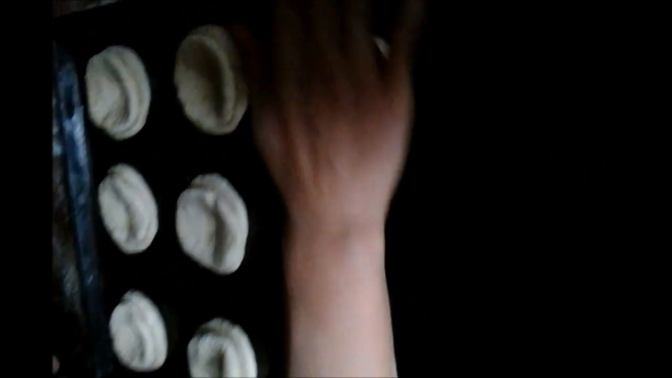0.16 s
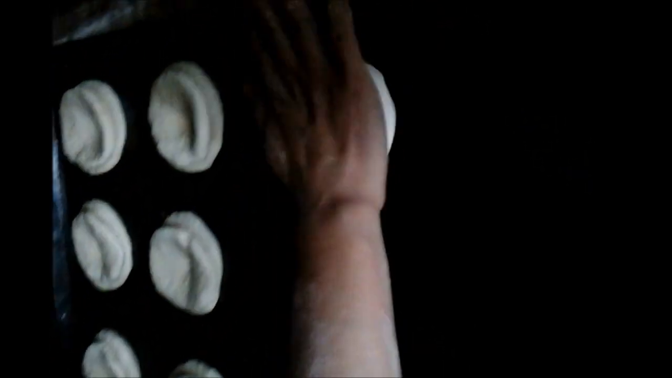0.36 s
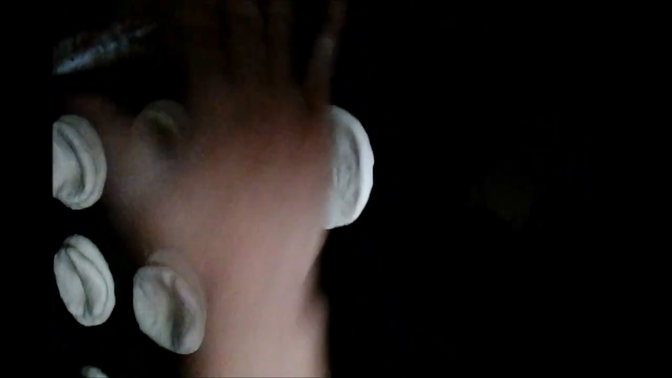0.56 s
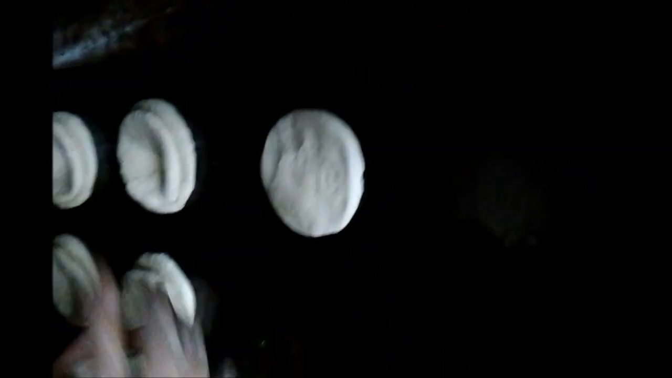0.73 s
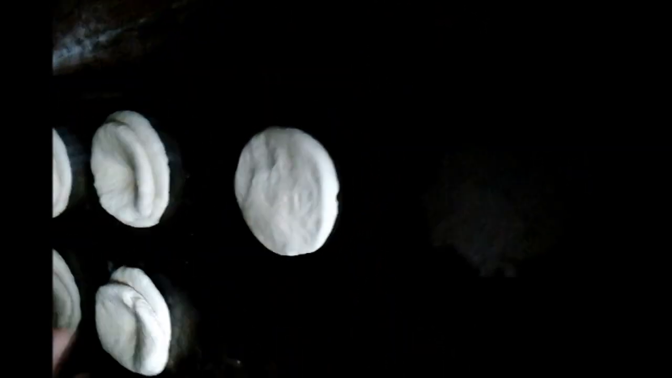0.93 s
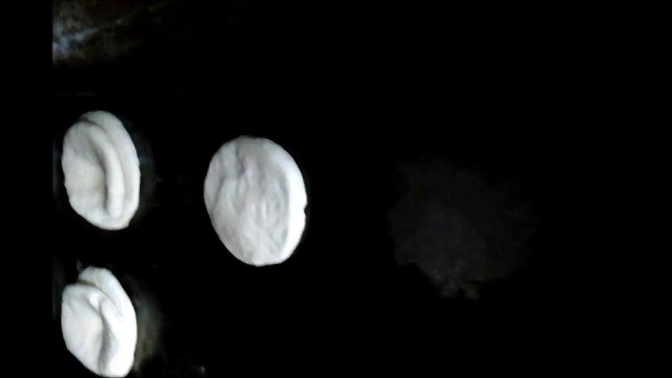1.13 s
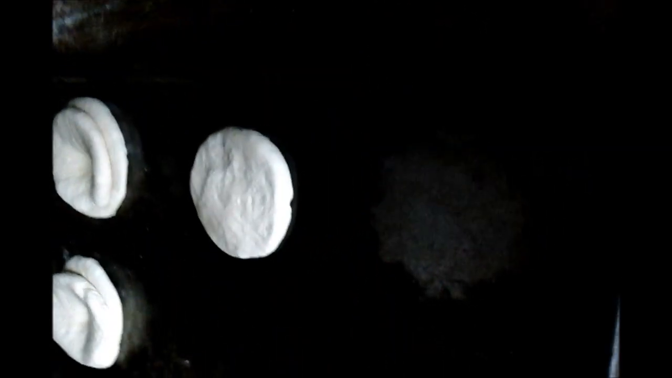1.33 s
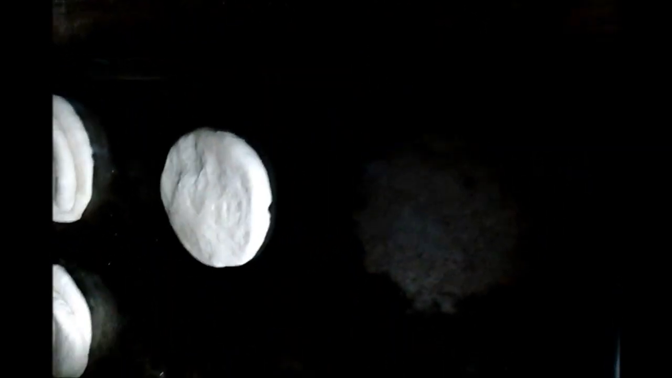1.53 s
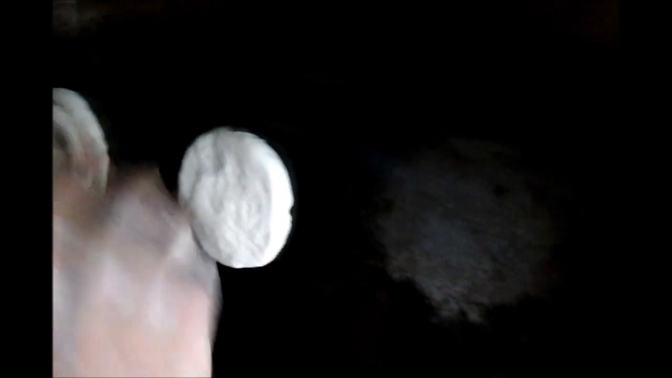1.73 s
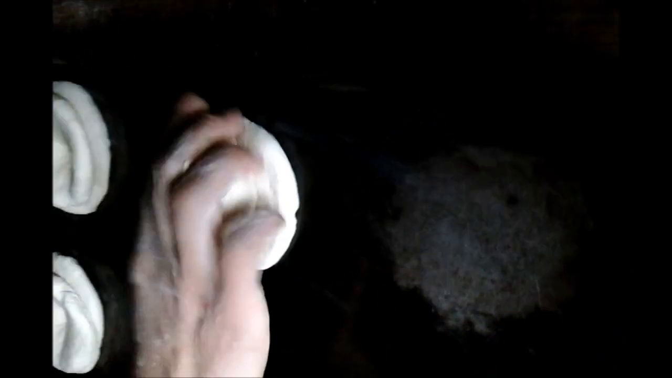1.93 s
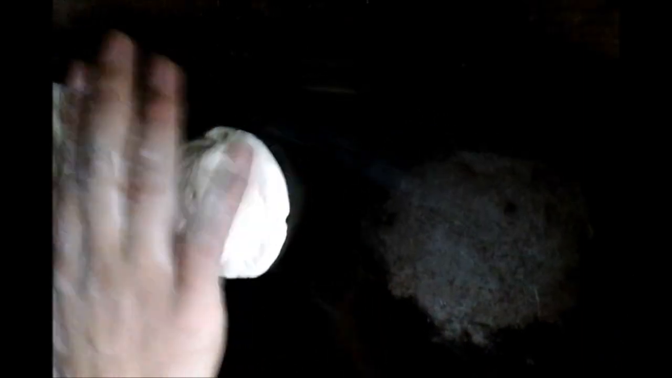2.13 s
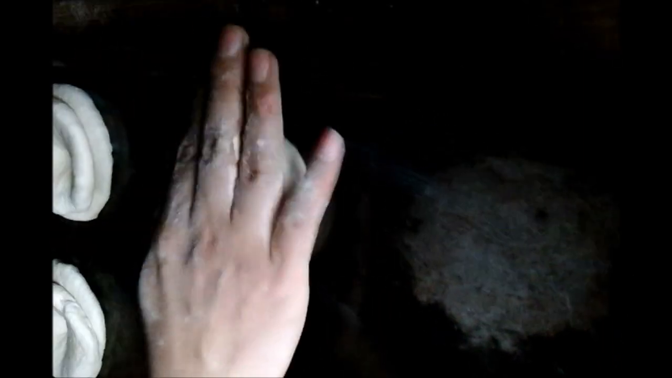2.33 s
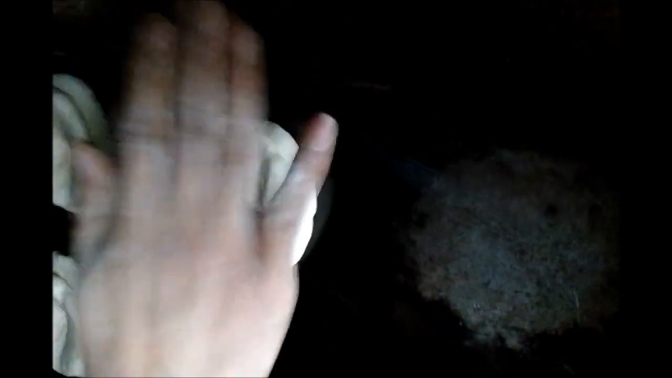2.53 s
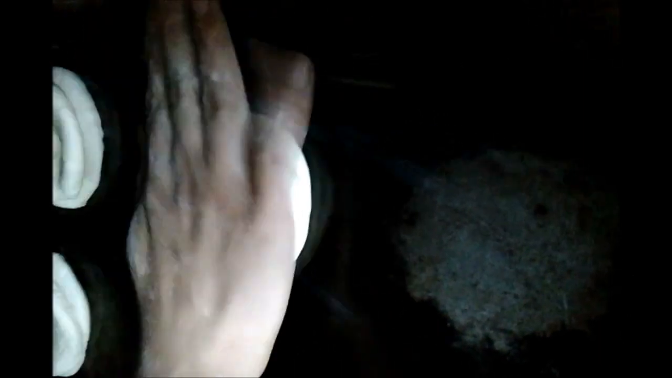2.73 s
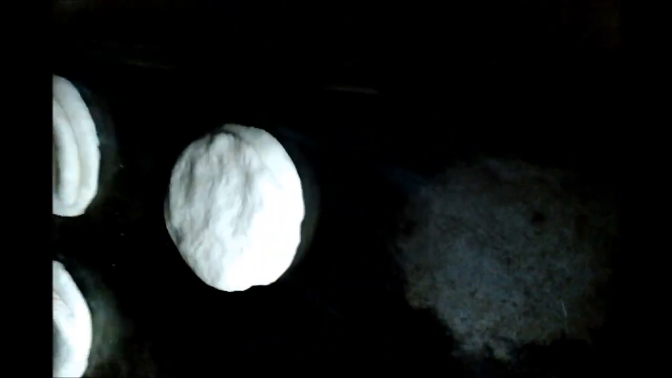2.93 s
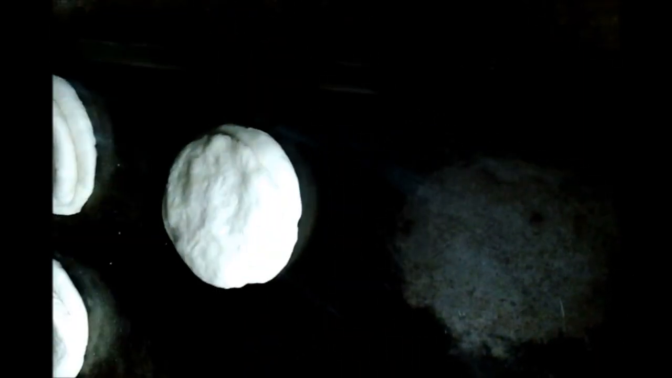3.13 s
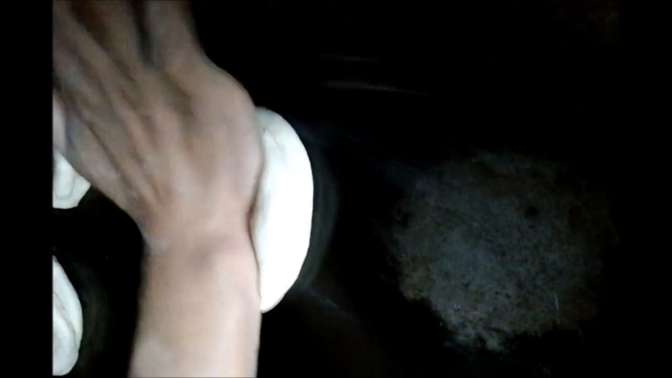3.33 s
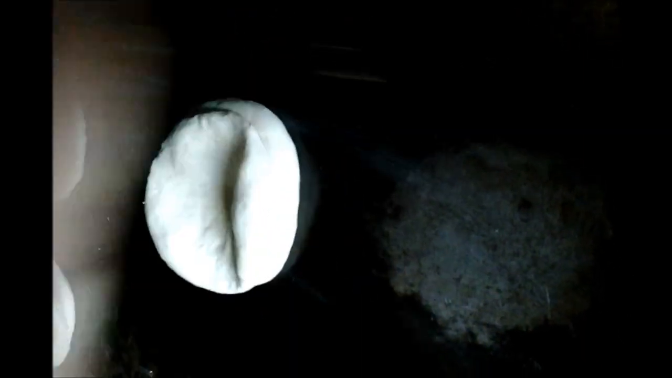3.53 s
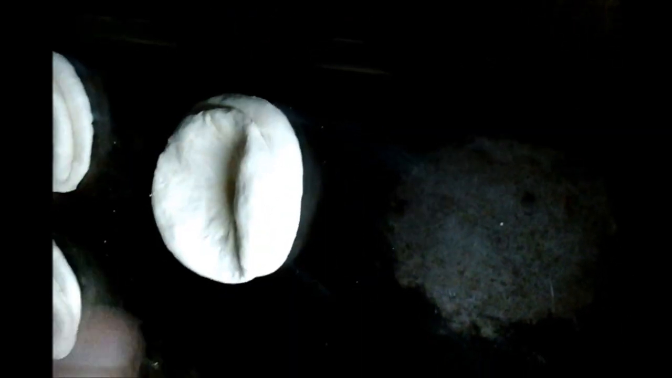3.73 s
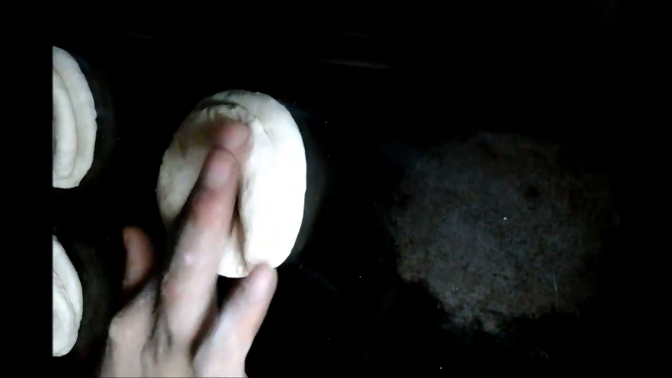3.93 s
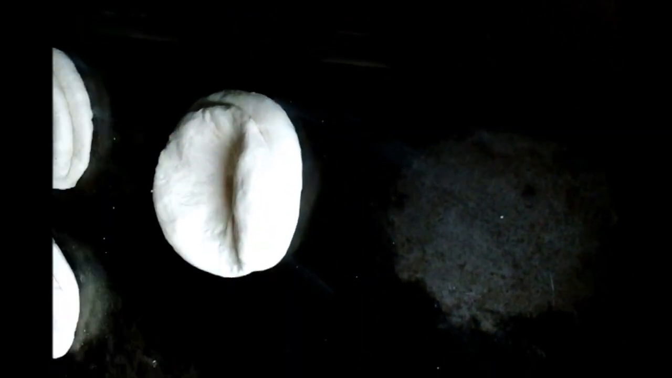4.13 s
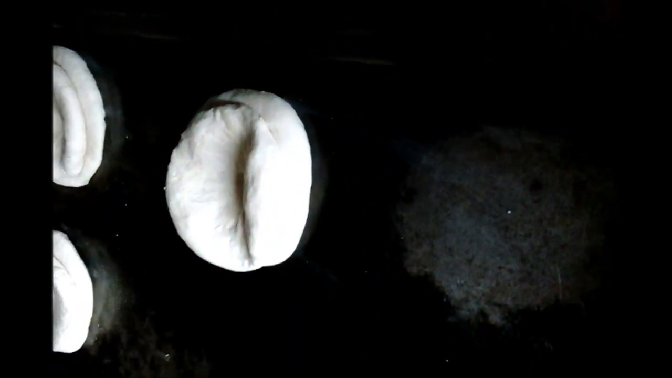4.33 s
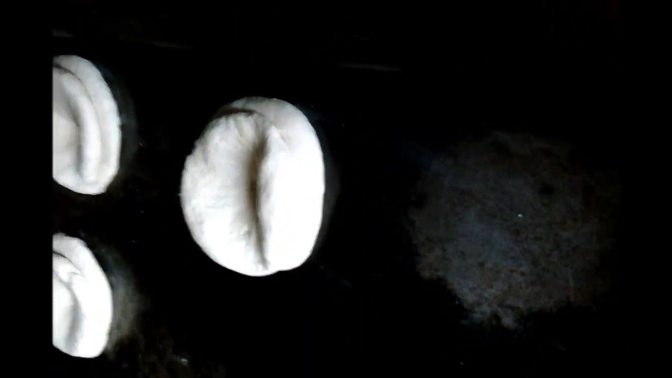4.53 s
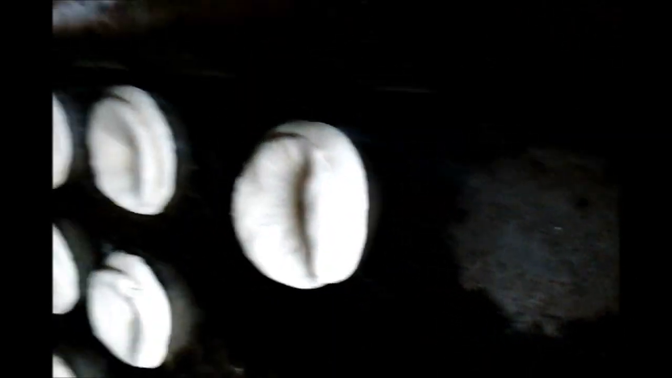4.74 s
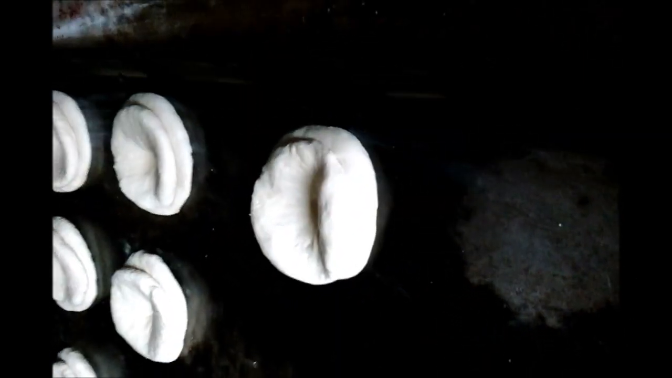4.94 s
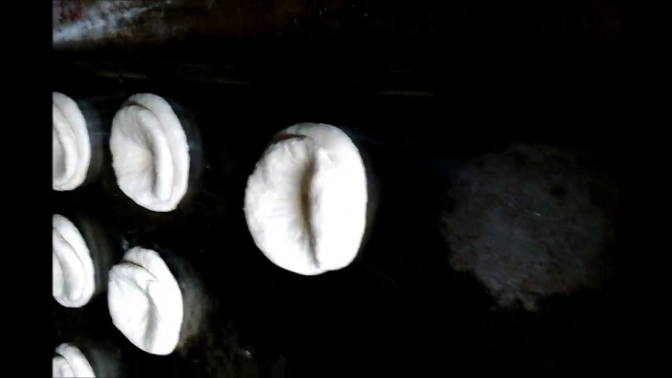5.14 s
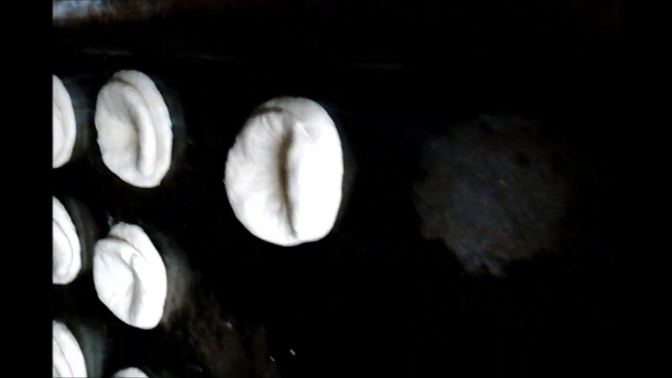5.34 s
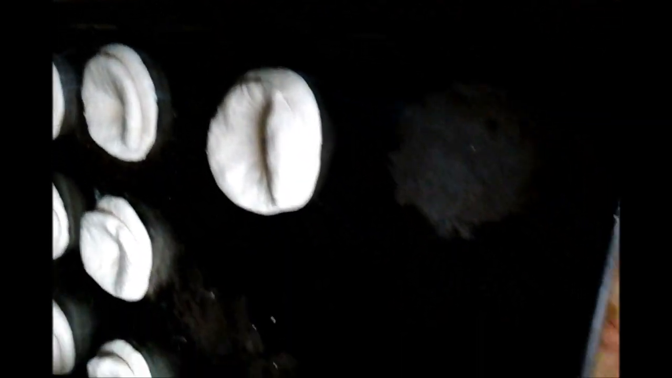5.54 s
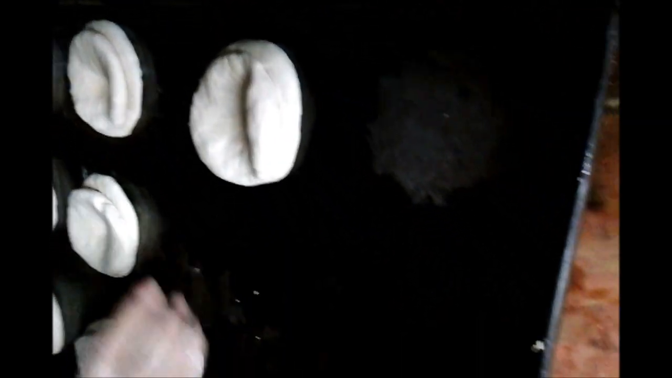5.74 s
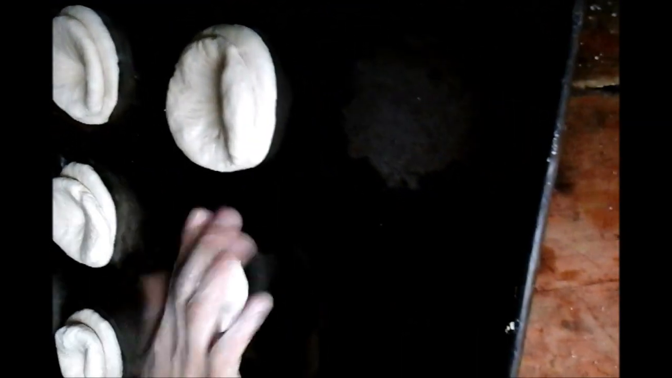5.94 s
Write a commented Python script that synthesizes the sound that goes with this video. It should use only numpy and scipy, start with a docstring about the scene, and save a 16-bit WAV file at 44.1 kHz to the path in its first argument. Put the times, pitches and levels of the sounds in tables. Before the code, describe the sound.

A small room with a steady low rumble and faint hiss, heard through close stereo microphones. From 0 to 1 s, soft pats on dough and dull, short metallic tray knocks come irregularly, with floury finger brushing and tiny sticky ticks. From about 1.1 to 1.9 s it is nearly quiet, with only faint brushes and ticks. Knocks resume at 2 s and thicken from 2.4 s; a crisp slap with a strong tray knock lands at 2.77 s. Around 3.3 to 3.36 s comes the loudest moment: a rapid cluster of hard, flat smacks with deep thuds, briefly overloading. A solid knock follows at 3.57 s, then smaller ones at 3.65-3.77 s and lighter taps until 4.5 s. Brushing and short gritty tray scrapes run from 4.5 to 5.3 s, with a soft low thud near 4.95 s. A faint scrape follows at 5.6 s, and a small smack ends it at 5.95 s.

```python
"""Hands pat and slap rounds of soft dough on a metal baking tray in a small bakery room.
Each push rocks the tray, which knocks dully on the table: bending waves, damped modes and a sinking twang.
Skin smacks the dough with shaped noise bursts; fingertips tick loose, and brushes and shoves are noise grains.
A steady low rumble and faint hiss lie beneath.
Two close microphones of opposite polarity hear it; the hardest slap overloads them."""
import sys
import numpy as np
from scipy import signal
from scipy.fft import rfft, irfft
from scipy.io import wavfile

SR = 44100
rng = np.random.default_rng(int(sys.argv[2]) if len(sys.argv) > 2 else 0)


def transcribe(u):
    """Save the signal u as a 16-bit wav file named by the first command-line argument.

    u: samples, shape (n,) or (channels, n), limited to [-1, 1]; the rate is SR.
    q: integer samples, one column per channel.
    """
    v = np.clip(np.atleast_2d(u).T, -1, 1)
    q = np.round(v * 32767).astype(np.int16)
    wavfile.write(sys.argv[1], SR, q)


N = 263718  # length in samples

# spectrum of hollow, dull noise, for the palm pocket and the chattering rim: (frequency [Hz], level [dB])
HOLLOW_SPECTRUM = [(60, -17), (300, -4.5), (600, -5.5), (1050, 0), (1700, -9), (2800, -7), (5000, -15.5),
                   (14000, -50.5)]


def amp(db):
    """Decibels to gain."""
    return 10 ** (np.asarray(db) / 20)


def unit(x):
    """Scales to rms 1."""
    return x / np.sqrt(np.mean(x ** 2) + 1e-20)


def read(points, hz):
    """Reads a table on a log-frequency axis."""
    f, value = np.transpose(points)
    return np.interp(np.log(hz + 1), np.log(f + 1), value)


def add(mix, s, sound):
    """Mixes a sound in at time s."""
    part = mix[max(round(s * SR), 0):][:len(sound)]
    part += sound[:len(part)]


def bins(size):
    """Frequencies of a real spectrum."""
    return np.fft.rfftfreq(size, 1 / SR)


def pulse(spectrum, size=4096):
    """The sharpest causal (minimum-phase) pulse with this spectrum, of energy 1."""
    log_gain = np.log(amp(read(spectrum, abs(np.fft.fftfreq(size, 1 / SR)))))
    shape = np.fft.ifft(np.exp(np.conj(signal.hilbert(log_gain)))).real
    return shape / np.linalg.norm(shape)


def colour(x, spectrum):
    """Gives a sound this spectrum without smearing its attack."""
    return signal.fftconvolve(x, pulse(spectrum))[:len(x)]


def diffuse(size):
    """Spectra of noise arriving from all sides: closely alike at both microphones in the bass only."""
    mic_spacing_m, sound_speed_m_s = 0.15, 343
    a, b = rfft(rng.standard_normal((2, size)))
    same = np.sinc(2 * bins(size) * mic_spacing_m / sound_speed_m_s)
    return np.array([a, same * a + np.sqrt(1 - same ** 2) * b])


def hush(level_db=-50.5, own_db=-11):
    """Steady low rumble and faint hiss, a little of it separate at each microphone."""
    # (frequency [Hz], level [dB])
    hush_spectrum = [(20, -3), (60, -2), (110, -0.5), (170, 5.5), (300, -1), (500, -7.5), (1000, -15),
                     (2000, -22), (3600, -23.5), (5000, -24.5), (5900, -17.5), (7500, -25.5), (9500, -25.5),
                     (14500, -26)]
    hz = bins(N)
    own = rfft(rng.standard_normal((2, N))) * hz / (hz + 60)
    noise = diffuse(N) + amp(own_db) * own
    return amp(level_db) * unit(irfft(noise * amp(read(hush_spectrum, hz)), N))


def smack(db, length_s, hollow_db, gap_hz, size=8192):
    """Air spurts through the closing gap between skin and dough; the palm's pocket adds a hollow pop."""
    # hiss of the spurting air: (frequency [Hz], level [dB])
    hiss_spectrum = [(25, -13.5), (110, 5.5), (900, -20.5), (2000, -14.5), (3200, -0.5), (4800, 1.5),
                     (6000, -4), (7500, -1.5), (10000, -21), (14500, -27)]
    gap_width_hz, gap_db, hiss_db = 2900, -5, -6  # width of the resonance on each of its two passes
    crackle_db, fizz_db, fizz_slope = 4, -26, 0.45  # slope in dB of fizz lost per dB of strength

    t = np.arange(size) / SR
    swell = (1 - np.exp(-t / 0.0013)) * np.exp(-(t / length_s) ** 2)
    jet, puff = swell * rng.uniform(-1.123, 1, (2, size))  # slightly lopsided noise
    # tacky skin grips in tiny snaps
    crackle = jet * amp(crackle_db * np.minimum(rng.exponential(1, size), 5))
    peak = signal.iirpeak(gap_hz, gap_hz / gap_width_hz, fs=SR)
    gap = signal.lfilter(*peak, signal.lfilter(*peak, jet))

    sound = amp(gap_db) * unit(gap)
    sound += amp(hiss_db) * unit(colour(crackle, hiss_spectrum))
    sound += amp(hollow_db) * unit(colour(puff, HOLLOW_SPECTRUM))
    # dry flour fizzes, most plainly under a light touch
    sound += amp(fizz_db - fizz_slope * db) * unit(crackle)
    return sound * amp(db) * jet.std()


def smacks():
    """Skin smacks on dough, and small ticks as tacky dough lets go of a fingertip: near sound and room send."""
    # (time [s], strength [dB], length [s], hollow of the palm [dB], low for flat fingers)
    hits = [(.042, -30, 0.0044, 0), (0.367, -27, 0.0033, -2), (0.386, -28, 0.0049, 2),
            (0.447, -33, 0.019, -4.5), (1.06, -46, 0.0067, 4.5), (2.7599, -29, 0.017, -5),
            (2.7645, -5, 0.0026, -21), (2.818, -20, .002, -13.5), (3.296, -32, 0.021, 4.5),
            (3.3038, -2.5, .0027, 4), (3.318, -23.5, 0.0056, 2.5), (3.325, 6.5, 0.0015, -14),
            (3.357, -1, 0.0026, -18), (3.362, -22, 0.042, -0.5), (3.438, -25, 0.016, -6.5),
            (3.509, -21.5, 0.0041, -8), (5.944, -28.5, 0.0068, 5.5), (5.9505, -14.5, 0.0037, -1)]
    # fingertips coming loose: (time [s], strength [dB])
    ticks = [(0.864, -27), (0.898, -29), (1.118, -31), (1.314, -34.5), (2.012, -33), (3.957, -32)]
    gap_hz = 5080  # pitch of the closing air gap
    tick_s, tick_hollow_db, tick_hz = 0.0021, -15.5, 7000
    # flat fingers crack toward the microphones, a hollow palm sends more into the room
    send_db, send_per_db = 0, 0.57

    near, send = np.zeros(N), np.zeros(N)
    touches = [(*hit, gap_hz) for hit in hits]
    touches += [(s, db, tick_s, tick_hollow_db, tick_hz) for s, db in ticks]
    for s, db, length_s, hollow_db, pitch_hz in touches:
        sound = smack(db, length_s, hollow_db, pitch_hz)
        add(near, s, sound)
        add(send, s, amp(send_db + send_per_db * hollow_db) * sound)
    return near, send


def bending_waves(blow, stretch):
    """A blow spreads through the sheet as bending waves, whose treble travels faster than their bass."""
    # straight, then back from the rims: (travel time at 1 kHz before the stretch [s], gain [linear])
    paths = [(.0009, 0.37), (.0035, 0.39), (.0075, 0.22)]
    hz = bins(2 * (len(blow) - 1))
    rim_loss = 1 / (1 + (hz / 3000) ** 2) * hz / (hz + 200)  # the rims return mostly the middle range
    waves = 0
    for k, (travel, gain) in enumerate(paths):
        phase = 4 * np.pi * np.sqrt(1000 * hz) * stretch * travel
        waves = waves + gain * np.exp(-1j * phase) * rim_loss ** (k > 0)
    return irfft(blow * waves)


def tray_modes(t):
    """The tray's dough-damped modes, one decaying sine a row."""
    # (frequency [Hz], relative level [dB], ring time t60 [s])
    modes = [(153, -11.5, 0.33), (202.2, -26, 0.16), (282.9, -15, 0.11), (468, 16.5, 0.047),
             (533, -2, 0.13), (669, -4, 0.13), (762.5, -14, 0.15), (1113, -6, 0.17), (1360, -13.5, .11),
             (1720, -15, 0.049), (2400, -5, .1)]
    rings = [amp(db - 60 * t / t60) * np.sin(2 * np.pi * f * t) for f, db, t60 in modes]
    return np.array(rings) * (1 - np.exp(-t / .005))


def twang(t, stretch, level_db=-13, start_hz=2400, rest_hz=620, relax_s=0.005, t60=0.085):
    """Bent metal is stiffer, so the twang sinks in pitch as it relaxes; stretch divides its pitches."""
    turns = np.cumsum(rest_hz + (start_hz - rest_hz) * np.exp(-t / relax_s)) / SR
    envelope = amp(level_db - 60 * t / t60) * (1 - np.exp(-t / .004))
    return envelope * np.sin(2 * np.pi * turns / stretch)


def rim_chatter(t, level_db=-22, peak_s=.0025):
    """The rim chatters as it seats: a brief swell of hollow noise."""
    contact = amp(level_db) * t / peak_s * np.exp(1 - t / peak_s)
    return contact * colour(rng.standard_normal(len(t)), HOLLOW_SPECTRUM)


def knocks(ring_db=-29, size=16384):
    """Pushes rock the tray so it knocks on the table: waves, modes, twang and chatter, softened by contact."""
    # the tray knocking on the table: (time [s], strength [dB])
    pushes = [(0.0556, -14.5), (0.1727, -23), (0.4103, -13.5), (.449, -27), (0.6216, -19.5), (0.7861, -21),
              (.812, -24), (0.9706, -21), (1.9599, -25), (2.4359, -23.5), (2.6081, -12), (2.675, -18),
              (2.7755, -2), (2.81, -15.5), (2.8759, -17.5), (3.032, -20), (3.2218, -18), (3.286, -21),
              (3.305, -5), (3.357, -11), (3.568, -7), (3.6483, -18.5), (3.712, -18.5), (3.769, -11.5),
              (3.91, -24.5), (3.9663, -18), (4.1191, -12.5), (4.1905, -16.5), (4.3107, -19.5), (4.38, -22),
              (4.46, -22.5), (4.5249, -28), (4.942, -25.5)]
    # the weight of the palm reaching the tray through the dough: (time [s], strength [dB])
    thuds = [(.416, -34), (2.448, -23), (3.321, 3), (3.371, -4.5), (4.946, -19)]
    # spectrum of the blow: (frequency [Hz], level [dB])
    blow_spectrum = [(30, -65.5), (85, -5.5), (180, 2), (310, -2), (420, -4), (620, -5.5), (1100, -23),
                     (2200, -43), (3300, -43.5), (5600, -29.5), (8000, -33), (14000, -79)]
    # a harder knock has a shorter contact and is brighter: treble corner at medium strength,
    # and the extra dB that raise it an octave
    corner_at_medium_hz, medium_db, db_per_octave = 2700, -15, 6
    thud_corner_hz = 262

    blows = [(s, db, corner_at_medium_hz * 2 ** ((db - medium_db) / db_per_octave)) for s, db in pushes]
    blows += [(s, db, thud_corner_hz) for s, db in thuds]
    t, out = np.arange(size) / SR, np.zeros(N)
    modes = tray_modes(t)
    blow = pulse(blow_spectrum)
    blow = rfft(blow / abs(blow).max(), size)
    chance = rng.standard_normal((len(blows), len(modes) + 1))
    for (s, db, corner_hz), (variation, *weights) in zip(blows, chance):
        # travel times and twang pitch vary at random by about 7 % from knock to knock
        stretch = 1 + .07 * variation
        knock = bending_waves(blow, stretch)
        knock += amp(ring_db + 4 * np.array(weights)) @ modes  # mode levels vary at random by about 4 dB
        knock += twang(t, stretch)
        knock += rim_chatter(t)
        cushion = np.exp(-2 * np.pi * corner_hz / SR)
        add(out, s, amp(db) * signal.lfilter([1 - cushion], [1, -cushion], knock[:-size // 8]))
    return out


def grains(per_s, spread_db):
    """Tiny slips of uneven size at random moments."""
    sizes = amp(spread_db * np.minimum(rng.exponential(1, N), 5))
    happens = rng.random(N) < per_s / SR
    return unit(sizes * rng.standard_normal(N) * happens)


def brushes():
    """Fingers brush over floury dough; each stroke swells and fades as a fine hiss of grains."""
    # (time [s], relative level [dB])
    strokes = [(0.066, -46.5), (0.538, -55.5), (.703, -54.5), (.82, -54), (1.019, -57.5), (1.352, -60.5),
               (1.56, -66.5), (1.955, -58.5), (2.342, -61.5), (2.524, -58.5), (4.189, -50.5), (4.325, -58),
               (4.523, -55), (4.779, -57.5), (5.588, -52.5), (5.812, -58)]
    # floury hiss: (frequency [Hz], level [dB])
    brush_spectrum = [(100, -20), (900, 0), (2500, -4.5), (3900, -5), (5800, 3.5), (7500, -5.5),
                      (10000, -12.5), (14500, -21)]
    rise_s = .026
    age, level = np.arange(SR) / SR / rise_s, np.zeros(N)
    for s, db in strokes:
        add(level, s, amp(db) * age * np.exp(1 - age))
    return colour(level * grains(per_s=9000, spread_db=3.5), brush_spectrum)


def slide():
    """Grit catches under the tray while each shove keeps it moving along the table."""
    # (time [s], length [s], relative level [dB])
    shoves = [(4.515, 0.12, -55), (4.788, 0.015, -63), (4.874, 0.015, -54.5), (4.938, 0.14, -52),
              (5.175, .1, -54), (5.597, 0.17, -60.5)]
    # gritty scrape: (frequency [Hz], level [dB])
    scrape_spectrum = [(60, -26), (160, -9), (380, 3), (700, -2.5), (1400, -6.5), (2500, -13.5), (3700, -8),
                       (4600, -15.5), (5900, -7.5), (7500, -18.5), (10000, -31.5), (14000, -43)]
    # a shove breaks loose with a jerk, runs evenly, and coasts to rest
    attack_s, jerk_db, jerk_s, coast_db_per_s = 0.0055, 7.5, 0.024, 71
    t, level = np.arange(SR) / SR, np.zeros(N)
    for s, length_s, db in shoves:
        shape_db = jerk_db * np.exp(-t / jerk_s) - coast_db_per_s * np.maximum(t - length_s, 0)
        add(level, s, np.minimum(t / attack_s, 1) * amp(db + shape_db))
    return colour(level * grains(per_s=1800, spread_db=2.5), scrape_spectrum)


def scatter_noise(size, t60):
    """Quick scatter among trays and moving arms: decaying diffuse noise."""
    t = np.arange(size) / SR
    return unit(irfft(diffuse(size)) * amp(-60 * t / t60) * (1 - np.exp(-t / .002)))


def tail_noise(size):
    """The room's tail: diffuse noise that builds up, then decays at its own rate in each band."""
    # (frequency [Hz], ring time t60 [s])
    ring_times = [(100, 0.5), (400, 0.33), (1200, 0.36), (3000, 0.27), (6000, 0.27), (13000, 0.34)]
    t = np.arange(size) / SR
    f, frame_s, z = signal.stft(irfft(diffuse(size)), SR, nperseg=256)
    decay = amp(-60 * frame_s / read(ring_times, f)[:, None])
    tail = signal.istft(z * decay, SR, nperseg=256)[1][:, :size]
    return unit(tail * (1 - np.exp(-(t / 0.034) ** 2)))


def room(x, send, scatter_db, scatter_t60, tail_db, pan_db, size=32768, count=3):
    """Direct sound x; what is sent outward returns as near echoes, quick scatter and the room's tail."""
    # near surfaces answer: (delay [s], left gain [linear], right gain [linear])
    near_echoes = [(.0027, 0.13, 0.1), (.0044, 0.079, 0.059), (.0105, 0.097, 0.088), (0.014, 0.31, 0.46),
                   (0.0201, 0.23, 0.31), (0.0307, 0.061, 0.28), (.0375, 0.25, .08)]
    left_lag_s, pose_s = 0.00028, .037  # pose: time for one pattern of reflections to fade into the next

    hz = bins(size)
    lag = np.exp(-2j * np.pi * hz * np.array([[left_lag_s], [0]]))
    direct = irfft(lag) * amp([[pan_db / 2], [-pan_db / 2]])
    answers = 0
    for s, left, right in near_echoes:
        answers = answers + np.array([[left], [right]]) * np.exp(-2j * np.pi * hz * s)
    routes = [(x, direct), (send, irfft(lag * answers))]
    for k in range(count):  # the arms move, so the patterns of reflections take turns
        turn = (np.arange(N) / SR / pose_s + k) % count
        share = np.sin(np.pi / 2 * turn) * (turn < 2)
        late = amp(scatter_db) * scatter_noise(size, scatter_t60) + amp(tail_db) * tail_noise(size)
        routes.append((send * share, late / np.sqrt(size)))
    return sum(signal.fftconvolve(v[None], path[:, :size // 2], axes=1)[:, :N] for v, path in routes)


def scene():
    """Tray, hands and background in one room."""
    blows, strokes = knocks(), brushes() + slide()
    hands = room(*smacks(), scatter_db=0.0, scatter_t60=0.032, tail_db=-0.5, pan_db=-3.5)
    tray = room(blows, blows, scatter_db=-1, scatter_t60=.014, tail_db=-9.5, pan_db=3.5)
    rubbing = room(strokes, strokes, scatter_db=9, scatter_t60=0.035, tail_db=5.5, pan_db=-6)
    return tray + hands + amp(-6.5) * rubbing + hush()


def record(dry):
    """The right microphone is inverted and thinner in the bass; peaks clip; then the band limit."""
    # sensitivity of the right microphone against the left: (frequency [Hz], level [dB])
    right_mic = [(100, -4.5), (400, 1), (1500, -1), (5000, 3), (12000, -1.5)]
    edge_hz = 14700
    right_gain = amp(read(right_mic, bins(2 * N)))
    right = -irfft(rfft(dry[1], 2 * N) * right_gain)[:N]
    clipped = np.clip([dry[0], right], -1, 1)
    band_limit = signal.firwin(401, edge_hz, window=("kaiser", 8), fs=SR)
    return signal.oaconvolve(clipped, band_limit[None], "same")


dry = scene()
out = record(dry)
transcribe(out)
```